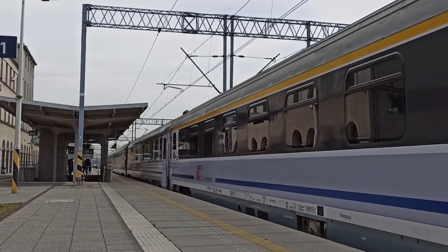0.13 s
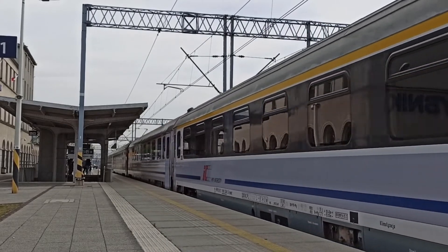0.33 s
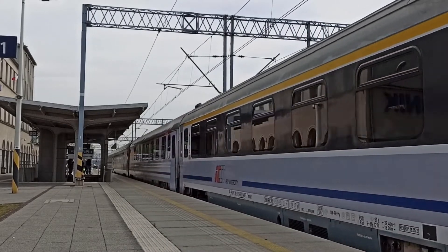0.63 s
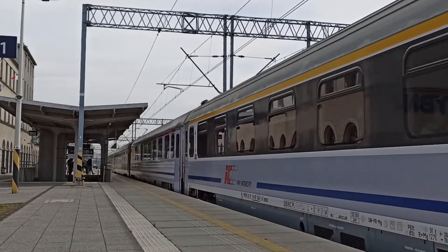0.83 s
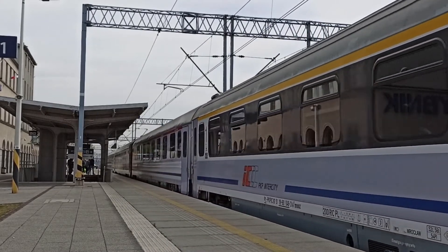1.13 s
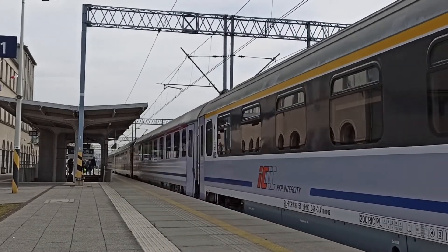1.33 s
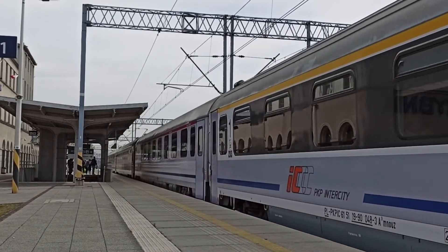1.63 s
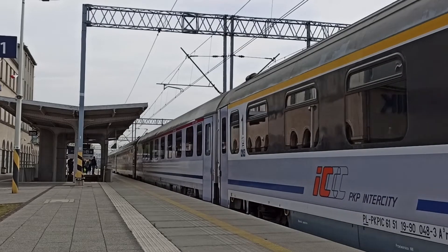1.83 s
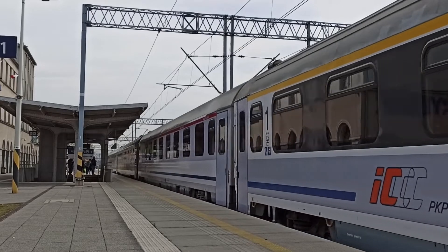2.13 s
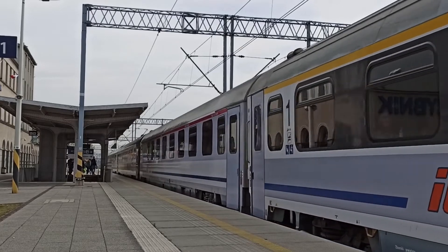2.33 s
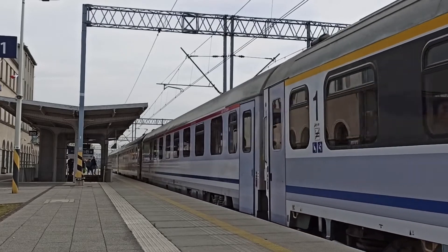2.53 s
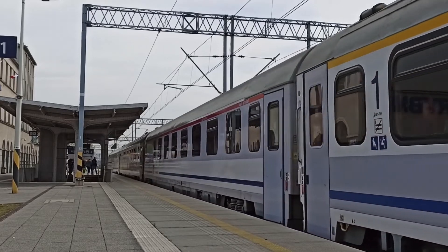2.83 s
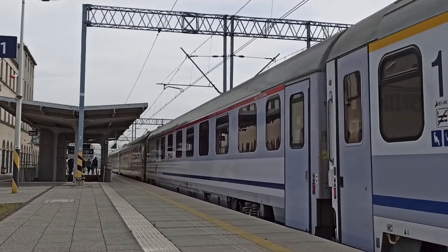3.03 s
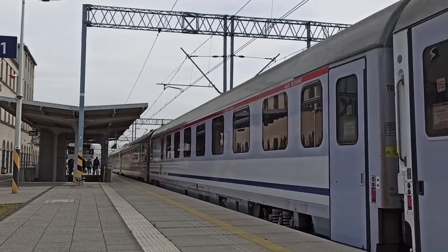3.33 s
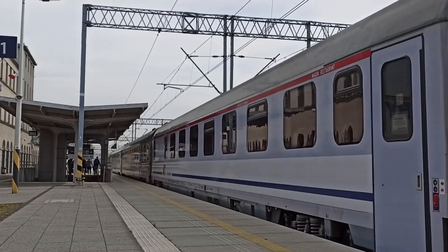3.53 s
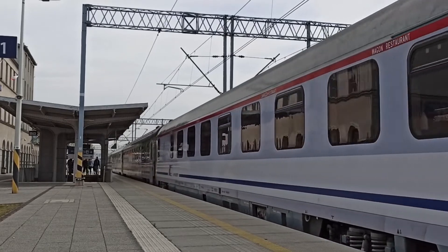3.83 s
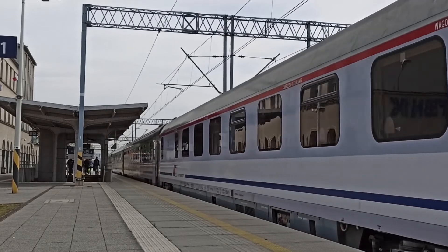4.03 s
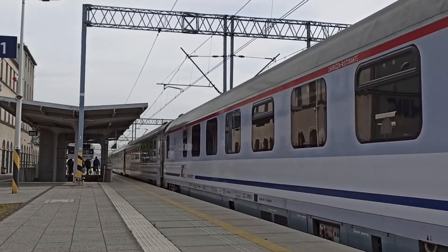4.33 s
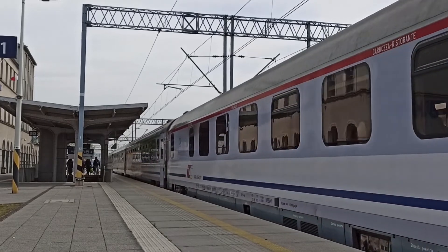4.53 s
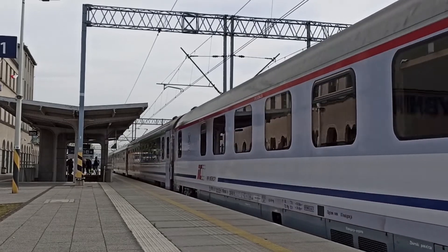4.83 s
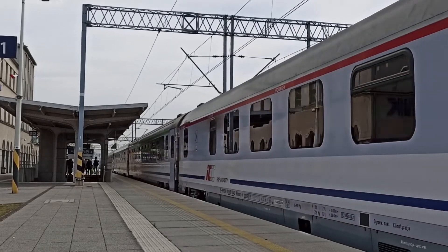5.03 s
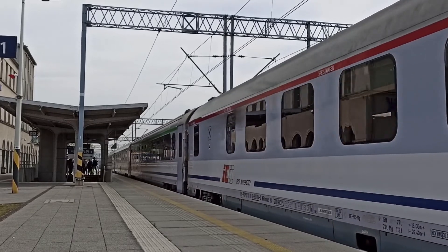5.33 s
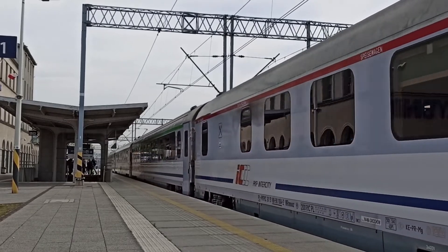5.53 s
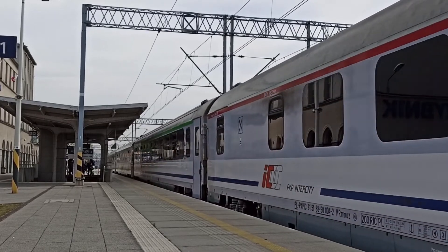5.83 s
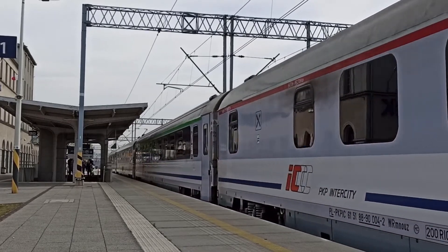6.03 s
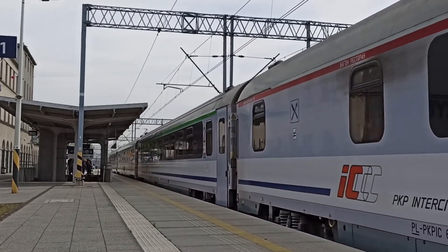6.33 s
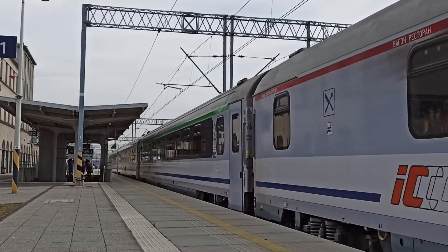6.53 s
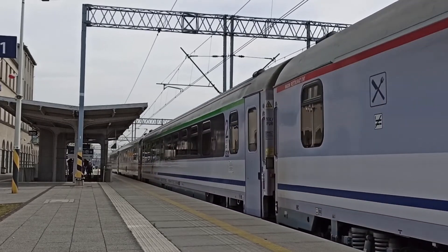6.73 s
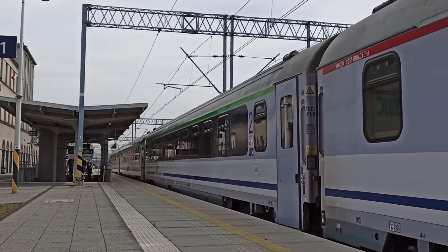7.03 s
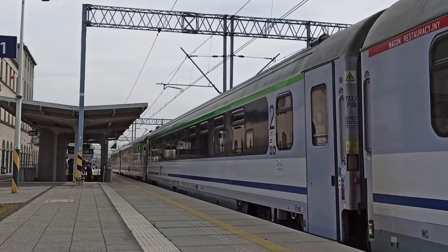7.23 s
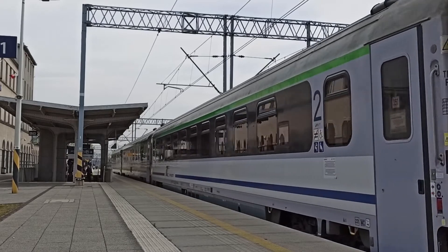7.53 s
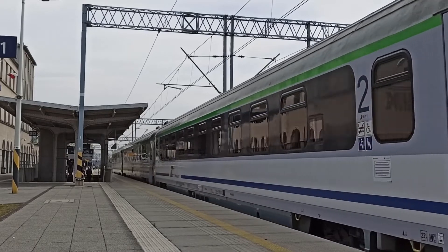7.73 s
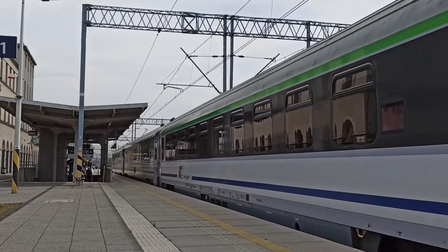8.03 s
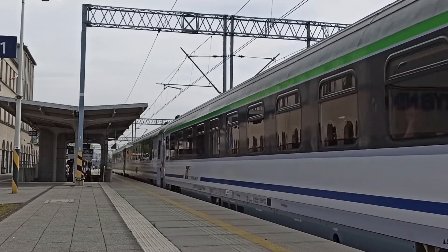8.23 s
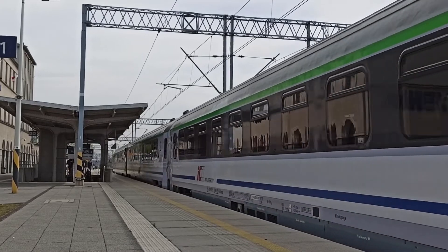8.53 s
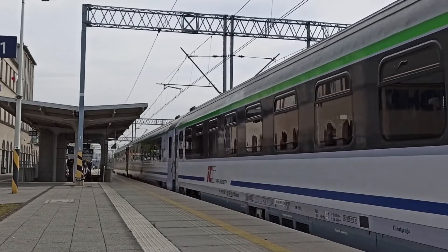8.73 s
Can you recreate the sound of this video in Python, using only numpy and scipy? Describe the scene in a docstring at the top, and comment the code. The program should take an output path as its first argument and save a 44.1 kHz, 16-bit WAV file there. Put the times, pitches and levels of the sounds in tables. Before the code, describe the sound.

An electric locomotive hums away with rising and sinking tones while coaches roll past a platform, rumbling, hissing, faintly squealing, crackling and scraping.

```python
"""Wheels and rails rumble, roar and hiss as coaches roll past a platform, a few metres to the right: shaped noise.
Ahead, an electric locomotive pulls away, its drive humming in harmonics that climb and converter tones that sink.
Each passing bogie rings faintly in damped wheel modes; wheels squeal in short, overlapping, sagging notes.
Grit crackles in decaying noise bursts, and steel scrapes and chatters in strokes of resonant noise."""
import sys
import numpy as np
from scipy import signal
from scipy.fft import rfft, irfft, next_fast_len
from scipy.io import wavfile

SR = 44100
rng = np.random.default_rng(int(sys.argv[2]) if len(sys.argv) > 2 else 0)


def pcm_store(signal):
    """Save signal as 16-bit PCM."""
    levels = np.round(np.clip(np.atleast_2d(signal), -1, 1) * 32767)
    wavfile.write(sys.argv[1], SR, levels.astype(np.int16).T)


N = 392477
TIME = np.arange(N) / SR
SIZE = next_fast_len(N, real=True)
FREQS = np.maximum(np.arange(SIZE // 2 + 1) * SR / SIZE, 1)
SPEED_M_PER_S = 6.26

# passing bogies: (time abreast [s], ringing level [dB])
BOGIE_PASSES = [(3.7, -45.5), (4.901, -46), (7.65, -44.5), (8.65, -49.5)]


def from_db(db):
    """Level to amplitude: 20 dB is a factor of ten."""
    return 10 ** (np.asarray(db) / 20)


def rms_one(x):
    """Normalises the mean power to 1."""
    return x / np.sqrt(np.mean(x ** 2) + 1e-20)


def in_time(rows):
    """Linear interpolation of each column of a curve at every sample."""
    s, *columns = np.transpose(rows)
    return [np.interp(TIME, s, c) for c in columns]


def over_hz(points):
    """Interpolation of a spectrum along a logarithmic frequency axis."""
    hz, value = np.transpose(points)
    return np.interp(np.log(FREQS), np.log(hz), value)


def drift(corner_hz):
    """Slow random modulation of unit power: white noise through two equal low-pass poles."""
    step = 40   # samples between slow values
    pole = np.exp(-2 * np.pi * corner_hz * step / SR)
    white = rng.standard_normal(N // step + 2002)
    slow = signal.lfilter([1], [1, -2 * pole, pole * pole], white)[2000:]   # without the filter's run-in
    return np.interp(np.arange(N) / step, np.arange(len(slow)), rms_one(slow))


def pan(left_minus_right_db):
    """Stereo by level difference: half of it on each channel, with opposite signs."""
    return from_db(np.array([[left_minus_right_db], [-left_minus_right_db]]) / 2)


def resonances(modes, width_hz):
    """Modal superposition: the powers of equally damped resonances add; width is taken at half amplitude."""
    power = 0
    for hz, db in modes:
        detuning = 2 * (FREQS - hz) / width_hz
        power = power + from_db(db) ** 2 / (1 + detuning ** 2) ** 2
    return np.sqrt(power)


def field(gain, lag_s=0.00039):
    """Direct and diffuse field: direct noise reaches the left side late; diffuse noise loses coherence with pitch."""
    # share of the power that arrives directly: (frequency [Hz], share [0-1])
    direct_share = [(100, 0.65), (500, 0.7), (1400, 0.57), (2400, 0.23), (8000, 0.04)]
    port_gap_s = 0.00028   # travel time between the two receiving points
    turn = np.float32(2 * np.pi) * rng.random((3, len(FREQS)), dtype=np.float32)
    direct, mid, side = np.cos(turn) + 1j * np.sin(turn)
    hz = np.float32(FREQS)
    share = np.float32(np.clip(over_hz(direct_share), 0, 1))
    coherence = .93 * np.sinc(hz * np.float32(2 * port_gap_s))
    mid = mid * np.sqrt((1 - share) * (1 + coherence) / 2)
    side = side * np.sqrt((1 - share) * (1 - coherence) / 2)
    direct = direct * np.sqrt(share)
    late = hz * np.float32(2 * np.pi * lag_s)
    left = direct * (np.cos(late) - 1j * np.sin(late)) + mid + side
    right = direct + mid - side
    return rms_one(irfft(np.float32(gain) * np.array([left, right]), SIZE)[:, :N])


def noise(spectrum, level_db, flutter_db, rate_hz):
    """Amplitude-modulated coloured noise: its level flutters about a curve."""
    return field(from_db(over_hz(spectrum))) * from_db(level_db + flutter_db * drift(rate_hz))


def tone(hz, level_db, rough, rate_hz, lag_s):
    """Multipath fading: shifting reflections off coaches and platform blur a sine, increasingly with time."""
    delay = np.array([[lag_s], [0]])   # the left side hears it later
    phase = (2 * np.pi * (np.cumsum(hz) / SR - hz * delay)).astype(np.float32)
    blur = rough + 0.021 * TIME
    in_phase = np.sin(phase) * (1 + blur * drift(rate_hz))
    quadrature = np.cos(phase) * blur * drift(rate_hz)
    return from_db(level_db) * rms_one((in_phase + quadrature) / np.sqrt(1 + 2 * blur ** 2))


def swell(s, length_s):
    """Half-sine envelope of a short stroke, with the samples that it covers."""
    at = np.arange(max(int(s * SR), 0), min(int((s + length_s) * SR), N))
    return at, np.sin(np.pi * (TIME[at] - s) / length_s)


def passing(abreast_s, reach_m):
    """Sideways directivity and spreading: gain is 1 abreast and 1/2 at the reach along the track."""
    return 1 / (1 + (SPEED_M_PER_S * (TIME - abreast_s) / reach_m) ** 2)


def ring_out(envelope, decay_s):
    """Energy storage: a one-pole average lets an envelope build up and linger."""
    keep = np.exp(-1 / (decay_s * SR))
    return signal.lfilter([1 - keep], [1, -keep], envelope)


CRUMBS_DECAY_S = 0.11   # trail of grit after a crackle or a scrape


def crackles(rise_s=.009, snap_decay_s=0.015, crumbs_db=-6.5):
    """Fracture bursts: powers add, each with a rapid snap and a longer trail of crumbs."""
    # gritty crackles beside the wheels: (start [s], relative level [dB])
    crackle_bursts = [(2.703, -37), (3.177, -39.5), (3.763, -41), (3.845, -41), (3.968, -36), (4.02, -35),
                      (4.078, -36.5), (4.231, -39), (4.262, -35), (4.326, -33), (4.381, -40), (4.475, -42),
                      (4.778, -41), (4.985, -38), (5.025, -38), (5.095, -44), (5.352, -46), (5.577, -39),
                      (5.77, -43), (5.865, -41), (6.019, -40), (6.083, -39), (6.13, -47), (6.335, -42),
                      (6.385, -39), (6.478, -39), (6.64, -41), (6.76, -38), (7.162, -43), (7.343, -41),
                      (7.385, -44), (7.5, -42), (7.595, -40), (7.678, -39.5), (7.742, -40), (7.785, -39),
                      (7.9, -46), (7.951, -43), (8.065, -39), (8.5, -46), (8.827, -44)]
    power = np.zeros(N)
    for s, db in crackle_bursts:
        start = int(s * SR)
        age = TIME[:min(N - start, SR // 2)]
        snap = np.exp(-age / snap_decay_s)
        crumbs = from_db(crumbs_db) * np.exp(-age / CRUMBS_DECAY_S)
        burst = from_db(db) * np.minimum(age / rise_s, 1) * np.hypot(snap, crumbs)
        power[start:start + len(age)] += burst ** 2
    return np.sqrt(power)


def steel(tick_db=-6, crumble_db=2.0, ground_off_db=-5, slip_db=3.0, width_hz=260):
    """Fracture and stick-slip: grit bursts; coupling strokes grind off grit and keep buffer plates ringing."""
    # modes of the scraping steel: (frequency [Hz], level [dB])
    coupling_modes = [(6280, -7.5), (7000, -10.5), (7690, -8.5), (8280, -0.5)]
    # lower modes of the buffer plates: (frequency [Hz], level [dB])
    buffer_modes = [(1750, 1), (2250, -4)]
    # spectrum of the grit: (frequency [Hz], relative density [dB per Hz])
    grit_spectrum = [(3000, -12), (6500, 13.5), (8200, -14.5), (12000, 7.5), (15500, 7.5)]
    # scraping strokes: (peak time [s], half-width [s], rubbing level [dB], drive of the buffer plates [dB])
    scrape_strokes = [(3.992, 0.018, -47, -54), (4.035, 0.023, -47, -52), (4.096, .022, -47, -50),
                      (4.285, 0.033, -49.5, -54), (4.342, 0.02, -45.5, -45), (4.389, .008, -40.5, -53),
                      (5.055, 0.046, -49, -57), (7.96, .018, -46, -58), (8.02, 0.026, -46, -42),
                      (8.118, 0.023, -43.5, -36), (8.188, 0.021, -41, -44), (8.253, 0.027, -43.5, -41),
                      (8.315, 0.019, -45, -42), (8.377, 0.017, -45, -52)]
    rubbing, buffer_drive = np.zeros((2, N))
    for s, width, rub_db, buffer_db in scrape_strokes:
        stroke = np.exp(-np.minimum(((TIME - s) / width) ** 2, 20))
        rubbing += from_db(rub_db) * stroke
        buffer_drive += from_db(buffer_db) * stroke
    ground_off = from_db(ground_off_db) * ring_out(rubbing, CRUMBS_DECAY_S)
    grit_gain = np.hypot(from_db(tick_db) * crackles(), ground_off)
    grit = grit_gain * noise(grit_spectrum, 0, flutter_db=crumble_db, rate_hz=200)
    stick_slip = from_db(slip_db * drift(120))
    scrapes = rubbing * field(resonances(coupling_modes, width_hz)) * stick_slip
    plates = ring_out(buffer_drive, decay_s=.05) * field(resonances(buffer_modes, width_hz))
    return grit * pan(-2.5) + (scrapes + plates) * pan(-2.2)


def squeals(waver=.0042, chatter_db=2.5, scatter_rad=0.79):
    """Stick-slip oscillation: slipping wheels sing, chatter, waver and sag; reflections scatter the phase."""
    # brief squeals: (start [s], length [s], mid-note pitch [Hz], sag [share of pitch per s], peak level [dB])
    squeal_notes = [(.015, .13, 2185, 0, -36), (.09, .1, 4650, 0, -47), (.13, .1, 2630, 0.75, -38),
                    (.26, .08, 2850, .3, -40), (.28, .08, 2580, .8, -41), (.44, .06, 2510, 0, -40),
                    (3.824, .16, 6330, 0, -61), (3.89, .12, 2610, 0, -47), (4.38, 0.67, 2750, 0.048, -54),
                    (4.48, .49, 6300, .01, -59), (4.54, .3, 2260, 0, -54), (4.58, .25, 3350, 0, -54),
                    (4.66, .12, 3965, .02, -49), (4.85, 0.39, 2260, .01, -50), (4.93, .22, 3365, 0, -52),
                    (5.05, .13, 3985, 0, -47), (5.65, .45, 3005, 0.017, -50),
                    (5.75, 0.41, 3340, 0.036, -55), (5.8, 0.42, 3720, 0, -53),
                    (6.55, 0.34, 3230, 0.11, -53), (6.7, .2, 1804, 0.034, -53),
                    (6.75, 0.8, 2270, 0.022, -58), (6.88, 0.21, 2131, .01, -48.5),
                    (7.18, 0.15, 1776, 0, -42), (7.2, 0.27, 2385, .01, -47), (7.28, 0.3, 3850, 0.031, -52),
                    (7.3, .27, 1530, 0.061, -57), (7.3, 0.53, 6287, 0.054, -54), (7.38, .28, 2665, 0, -50),
                    (7.46, 0.19, 1787, 0.019, -48), (7.6, 0.22, 2265, .02, -45.5),
                    (7.68, .25, 3665, .01, -53), (7.7, 0.18, 2780, 0, -54.5), (7.7, 0.34, 3355, .01, -49.5),
                    (7.83, .17, 2228, .02, -48), (8.03, .25, 3340, 0, -57), (8.1, 0.39, 4430, .02, -53),
                    (8.18, .2, 2410, 0, -51), (8.464, 0.31, 2370, .03, -52), (8.48, .28, 4010, 0, -54),
                    (8.5, .27, 4384, .04, -55), (8.58, .26, 3655, 0, -56), (8.6, .23, 6826, 0.059, -60),
                    (8.62, .18, 2930, .04, -55)]
    out = np.zeros((2, N))
    bend = 1 + waver * drift(15.3)
    chatter = rms_one(from_db(chatter_db * drift(45)))
    reflected = scatter_rad * np.array([drift(14), drift(14)])
    for s, length, hz, sag, level_db in squeal_notes:
        at, envelope = swell(s, length)
        own = (at + int(rng.random() * N)) % N   # each note reads its own stretch of the modulations
        pitch = hz * (bend[own] - sag * (TIME[at] - s - length / 2))
        note = np.sin(2 * np.pi * np.cumsum(pitch) / SR + reflected[:, own])
        out[:, at] += from_db(level_db) * envelope * rms_one(chatter[own]) * note
    return out


def wheels(distance_m=4.1, width_hz=42, waver_db=3.0, wear=.005, wobble=.004):
    """Modal ringing and Doppler shift: wavering groups of wheel modes swell and drop in pitch at each bogie."""
    # ringing modes of a wheel: (frequency [Hz], level [dB])
    wheel_modes = [(1530, 0.5), (1750, -5), (1800, 2), (2135, -4.5), (2260, -1), (2380, -9.5), (2680, -6),
                   (2800, -7.5), (2970, -4.5), (3250, -4.5), (3350, -6), (3660, -3), (3850, -6),
                   (3950, -4.5), (4030, -6.5), (4360, -5), (6270, -11.5), (6380, -10), (6830, -19.5)]
    out = np.zeros((2, N))
    groups = [resonances(wheel_modes[k::3], width_hz) for k in range(3)]
    total = sum(np.sum(modes ** 2) for modes in groups)
    rings = [field(modes) * np.sqrt(np.sum(modes ** 2) / total) for modes in groups]
    for abreast, level_db in BOGIE_PASSES:
        path_m = np.hypot(distance_m, SPEED_M_PER_S * (TIME - abreast))
        # no two wheels are worn alike, and their load shifts
        tuning = 1 + wear * rng.standard_normal() + wobble * drift(2.014)
        sent = (np.cumsum(tuning) / SR - path_m / 343) % TIME[-1]   # sound travels at 343 m/s
        ringing = sum(ring * from_db(waver_db * drift(12)) for ring in rings)
        heard = np.array([np.interp(sent, TIME, side) for side in ringing])
        out += heard * passing(abreast, distance_m) * from_db(level_db)
    return out


def hum_level(hz, start_db, fade_db_per_s, booms):
    """Resonant transmission: a fading tone is boosted or dips as its pitch crosses each band."""
    grid = np.arange(80, 800, .25)
    boom_db = sum(db * np.exp(-((grid - centre) / width) ** 2) for centre, width, db in booms)
    return start_db - fade_db_per_s * TIME + np.interp(hz, grid, boom_db)


def locomotive():
    """Harmonic radiation: drive hum climbs, converter tones sink, brief hums swell, cooling air recedes."""
    # climbing fundamental of the drive: (time [s], pitch [Hz])
    drive_pitch = [(0, 105.3), (.6, 108.7), (1.3, 113), (2, 117.7), (3, 122.6), (4, 127), (6, 136.6),
                   (8.9, 149.5)]
    # sinking tone of the converter: (time [s], pitch [Hz])
    converter_pitch = [(0, 332.5), (.5, 328.7), (1.1, 324.5), (1.9, 315), (2.6, 304.7), (3.4, 293.1),
                       (4.3, 282.5), (5.5, 273.6), (6.2, 269.6), (8.9, 253.4)]
    # drive harmonics from the first: (start level [dB], fade [dB per s], roughness [ratio], left lag [s])
    drive_tones = [(-32, 1.6, 0.32, 0.00015), (-28, 3, 0, 0.00012), (-34, 1.5, 0.25, 0.00011),
                   (-37.5, 3.5, 0.2, 0.0006), (-34.5, 6, 0, 0.0004), (-30.5, 12, 0.6, 0.00035)]
    # converter tone and octave: (start level [dB], fade [dB per s], roughness [ratio], left minus right [dB])
    converter_tones = [(-25, 2.5, 0.13, 0.5), (-44, 1.5, 0.7, -2.5)]
    # bands that the drive harmonics cross: (centre [Hz], half-width [Hz], boost [dB])
    drive_booms = [(113.3, 0.42, 6), (116.4, 0.6, 7), (119.1, 0.76, 7), (121, 0.19, 12.5), (214.8, 6, 12),
                   (225.7, 3.5, -13), (238, 12, 4), (254.7, 2.8, 13.5), (302, 8, 2)]
    # bands that the converter tones cross: (centre [Hz], half-width [Hz], boost [dB])
    converter_booms = [(271.7, 3.8, 11.5), (293.2, 4.5, 4.5), (301.7, 3.3, 2.5), (316, 2.2, 3),
                       (324, 1.7, 3), (330, 1.7, 4.5), (547, 8.9, 7.5), (600, 20, 12), (664.4, 3.9, 12)]
    # further hums: (start [s], length [s], start pitch [Hz], glide [Hz per s], peak level [dB], roughness [ratio])
    brief_hums = [(0, 1.65, 936, 15, -40, 1.14), (1.9, 0.57, 298.2, -3, -27.5, 0.46),
                  (3.399, 0.76, 436.4, -5, -36.5, .7), (5.499, .8, 408.4, 5.5, -35, 0.54),
                  (6.104, 1.35, 213.1, 8.5, -36, 0.9), (7.1, 1.58, 337.8, 23.5, -38, 0.35),
                  (7.599, 0.95, 214.5, 3.5, -33, 0.5)]
    # spectrum of the cooling air: (frequency [Hz], relative density [dB per Hz])
    air_spectrum = [(500, -10), (800, 9.5), (1000, 12), (1250, 10.5), (1600, -10.5), (2000, -5.5),
                    (3000, 2), (3900, -2.5), (4450, 4), (5500, -6), (6500, -6.5), (7450, 0.5),
                    (9000, -13.5), (15500, -21)]
    out = np.zeros((2, N))
    drive_hz = in_time(drive_pitch)[0]
    converter_hz = in_time(converter_pitch)[0]
    for k, (db, fade, rough, lag) in enumerate(drive_tones, 1):
        level_db = hum_level(k * drive_hz, db, fade, drive_booms)
        out += tone(k * drive_hz, level_db, rough, rate_hz=3.4, lag_s=lag)
    for k, (db, fade, rough, left_db) in enumerate(converter_tones, 1):
        level_db = hum_level(k * converter_hz, db, fade, converter_booms) + 1.5 * drift(2)
        out += tone(k * converter_hz, level_db, rough, rate_hz=6 * k, lag_s=0.00029) * pan(left_db)
    for s, length, hz, glide, db, rough in brief_hums:
        at, envelope = swell(s, length)
        hum = tone(hz + glide * (TIME - s), db, rough, rate_hz=hz / 36, lag_s=0.00013)
        out[:, at] += envelope * hum[:, at]
    air_db = -29.5 - 5 * TIME + .5 * drift(24)   # fades by 5 dB per s
    air = field(from_db(over_hz(air_spectrum)), lag_s=0.00029) * from_db(air_db)
    return out + air * pan(.5)


def rolling(bogie_reach_m=5, start_m=5.99):
    """Roughness excitation: wheels shake track, bogies and rails, less as the heavy locomotive leaves."""
    # spectra, each: (frequency [Hz], relative density [dB per Hz])
    rumble_spectrum = [(20, -24), (40, -30.5), (65, -10.5), (90, -4.5), (130, -1), (190, -0.5),
                       (260, -22.5), (400, -52.5)]
    roar_spectrum = [(130, -39.5), (210, 1), (280, 1), (380, -4), (500, -9.5), (650, -18), (1000, -56.5)]
    singing_spectrum = [(350, -39), (560, -1), (700, -2.5), (920, -2), (1150, -10.5), (1500, -11),
                        (2200, -24), (4000, -53)]
    hiss_spectrum = [(900, -22.5), (1500, -1.5), (1850, 1.9), (2500, -0.5), (4400, -2.5), (6400, -7),
                     (7600, -10), (9000, 7), (12000, -26), (15500, -35)]
    rubbing_spectrum = [(1500, -23), (2650, -18.5), (2980, -2), (3330, -3), (3600, -11), (5000, -14.5),
                        (6300, -12), (7600, -18), (8800, 0.5), (12000, -48)]   # under the middle coach
    # level laws, each: (start level [dB], drop per doubling of distance [dB], swell at a bogie [dB])
    rumble_law = (-26.5, 3.51, 0.68)
    roar_law = (-19, 3.97, 0.67)
    singing_law = (-26, 4.7, 0.55)
    # surges of the rolling noise: (time [s], half-width [s], rumble [dB], roar [dB], singing [dB])
    surge_times = [(.15, 0.3, 3, -0.5, 1), (3.15, 0.32, 0, 1.5, 1.3), (3.65, 0.55, 0, 2, 1.1),
                   (5.3, 0.23, 2.5, 0, 0.5), (7.3, 0.69, 2.5, 0.5, 4)]
    # start_m: how far the locomotive has already gone past
    doublings = np.log2(1 + SPEED_M_PER_S * TIME / start_m)
    near = sum(passing(abreast, bogie_reach_m) for abreast, _ in BOGIE_PASSES)
    surges = sum(np.outer(dbs, np.exp(-((TIME - s) / width) ** 2)) for s, width, *dbs in surge_times)
    laws = (rumble_law, roar_law, singing_law)
    levels = [db - drop * doublings + rise * near for db, drop, rise in laws]
    rumble_db, roar_db, singing_db = surges + levels
    rumble = noise(rumble_spectrum, rumble_db, flutter_db=1.0, rate_hz=15) * pan(.3)
    roar = noise(roar_spectrum, roar_db, flutter_db=1.0, rate_hz=13) * pan(.2)
    singing = noise(singing_spectrum, singing_db, flutter_db=0.9, rate_hz=26) * pan(-1.6)
    # contact patches hiss steadily, a trifle less at each bogie; the leading wheels hiss loudly as they go by
    coach_hiss = from_db(-42 - 0.23 * near)
    leading_hiss = from_db(-31.5) * passing(0.072, reach_m=2.6)
    hiss = noise(hiss_spectrum, 0, flutter_db=1.16, rate_hz=38) * pan(-0.55)
    hiss *= np.hypot(coach_hiss, leading_hiss)
    # something rubs under the middle coach: a narrow band in a broad hiss
    rub = passing(5.97, reach_m=7.3) * noise(rubbing_spectrum, -44.5, flutter_db=0.0, rate_hz=7)
    return rumble + roar + singing + hiss + rub


def scene():
    """Superposition of all the train's sources as heard from the platform."""
    return steel() + squeals() + wheels() + locomotive() + rolling()


def record(dry):
    """Linear filtering: the treble is hollowed, a little differently on each side, and the top is cut."""
    # hollows in the treble: (frequency [Hz], gain [dB])
    treble_hollows = [(4650, 1), (4950, -7.5), (5900, -0.5), (6300, 3), (7650, 5), (7950, 0),
                      (10000, -61.5), (11800, 0)]
    # balance of the two sides: (frequency [Hz], left minus right [dB])
    side_balance = [(1200, 0), (2000, -0.5), (4000, -1.8), (6000, 0.5), (8000, 0), (12000, -3.5)]
    colour_db = over_hz(treble_hollows) + over_hz(side_balance) * np.array([[.5], [-.5]])
    coloured = irfft(rfft(dry, SIZE) * from_db(colour_db), SIZE)[:, :N]
    low_pass = signal.ellip(12, .1, 90, 15600, fs=SR, output="sos")   # cutoff in Hz
    return signal.sosfilt(low_pass, coloured)


dry = scene()
out = record(dry)
pcm_store(out)
```